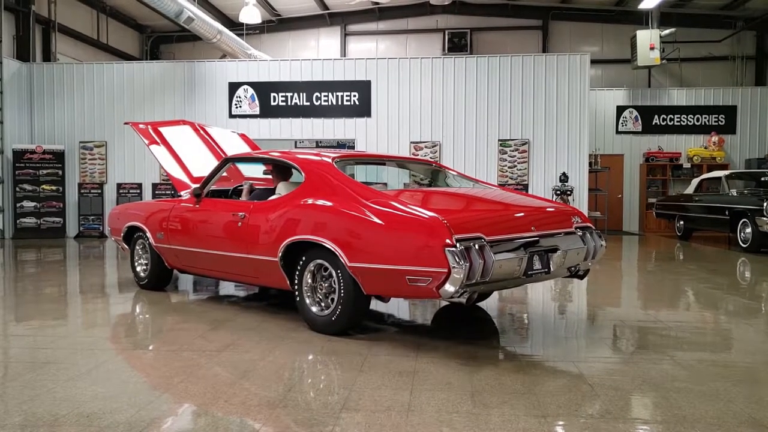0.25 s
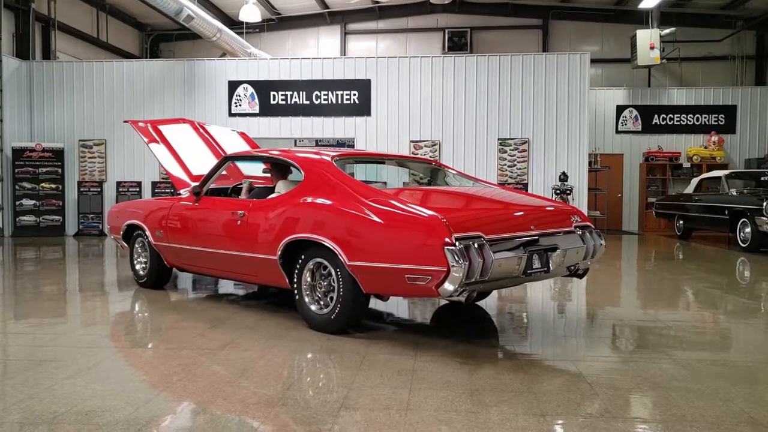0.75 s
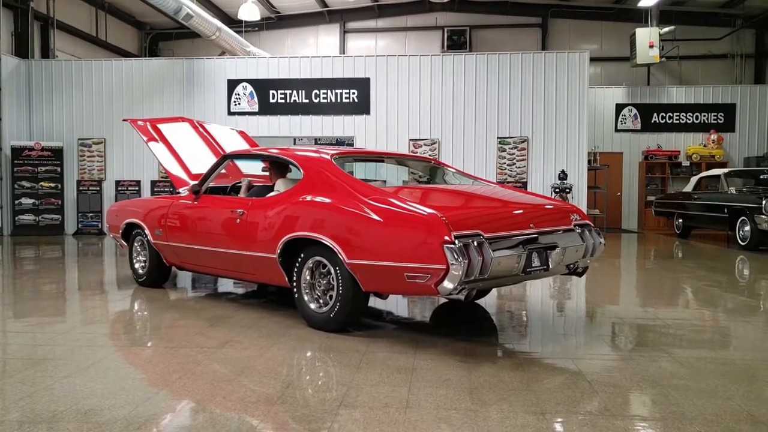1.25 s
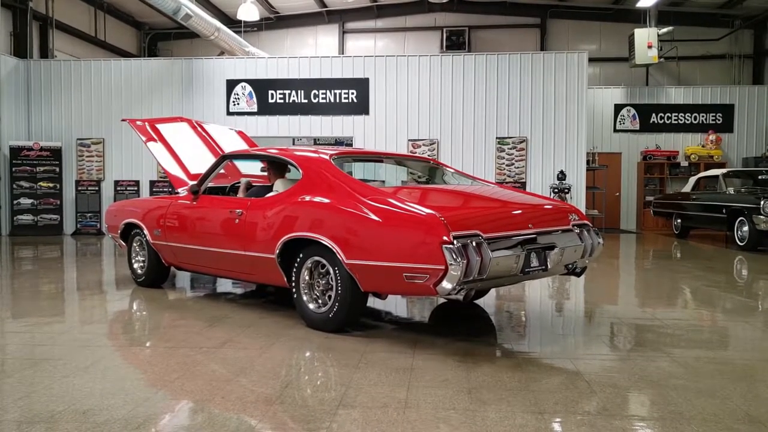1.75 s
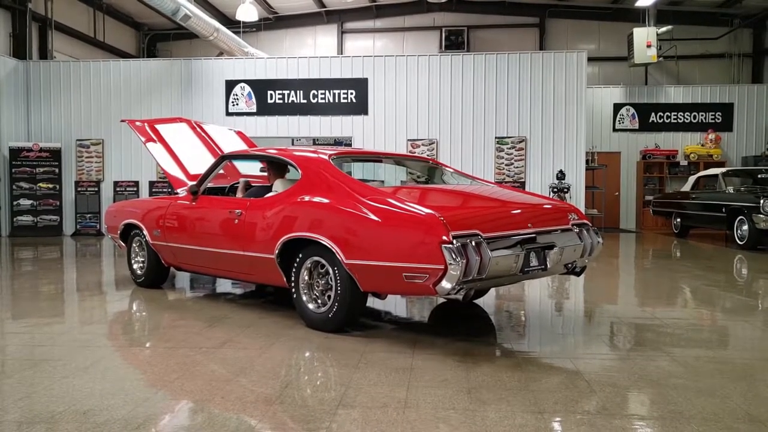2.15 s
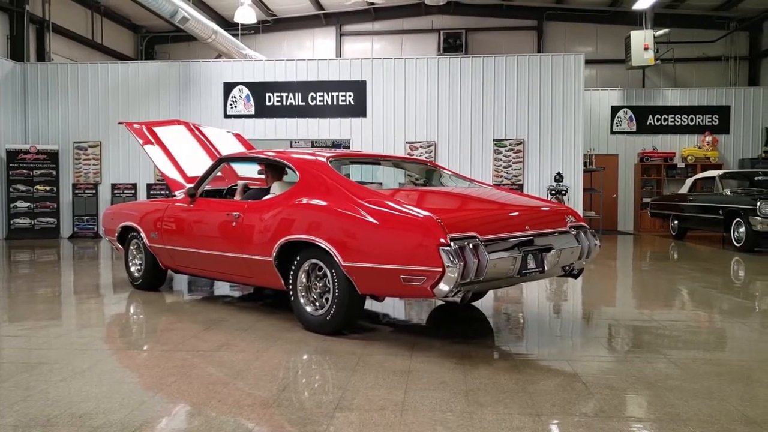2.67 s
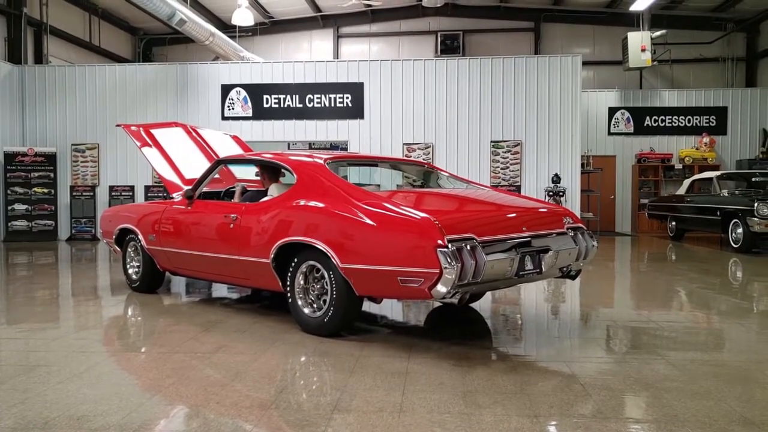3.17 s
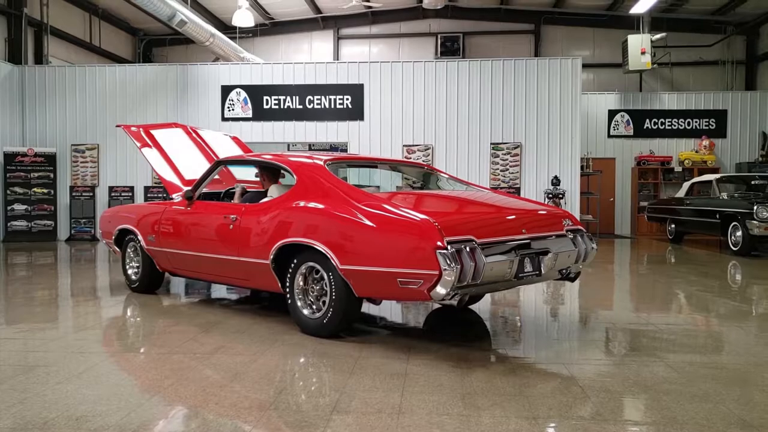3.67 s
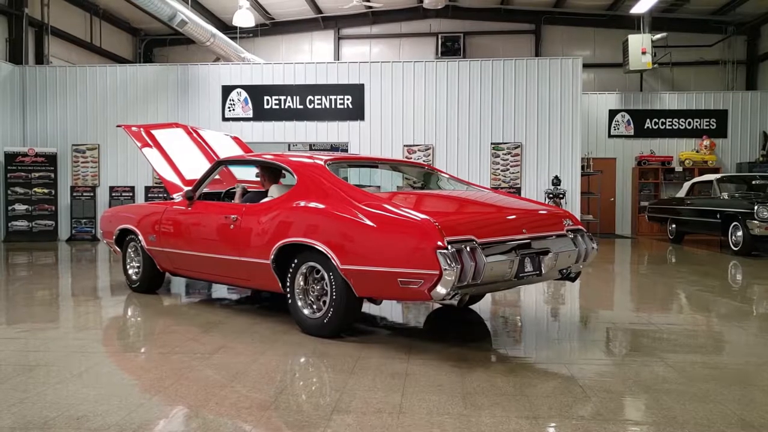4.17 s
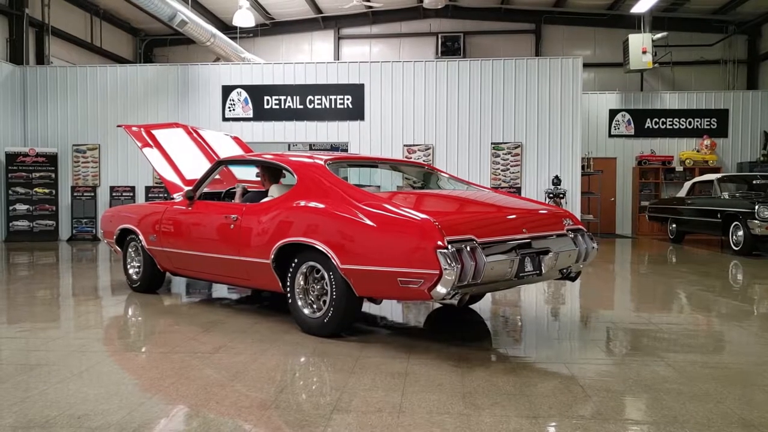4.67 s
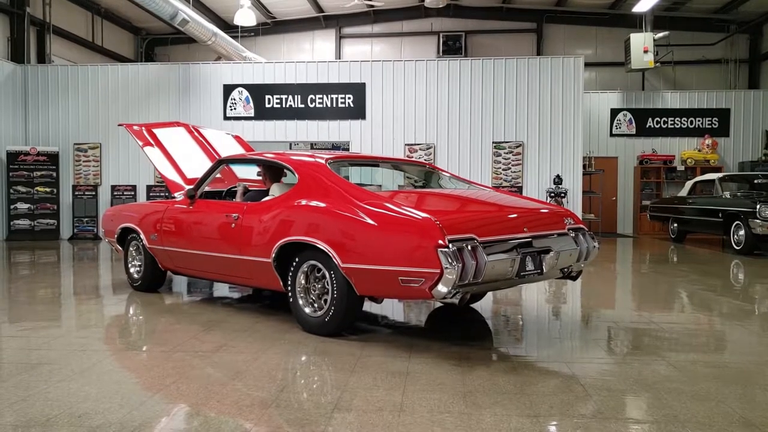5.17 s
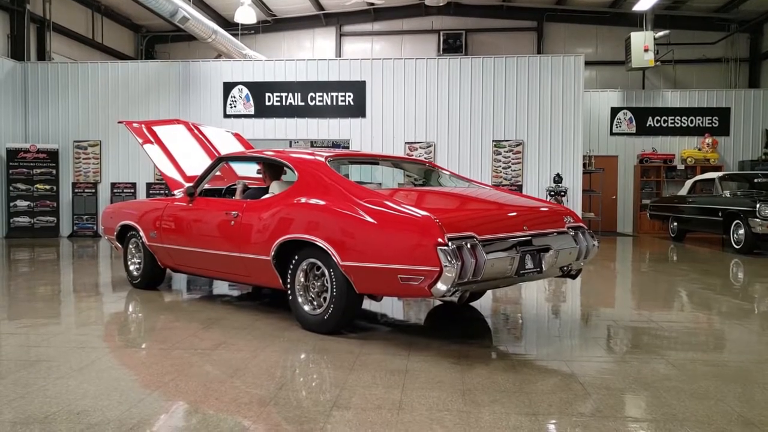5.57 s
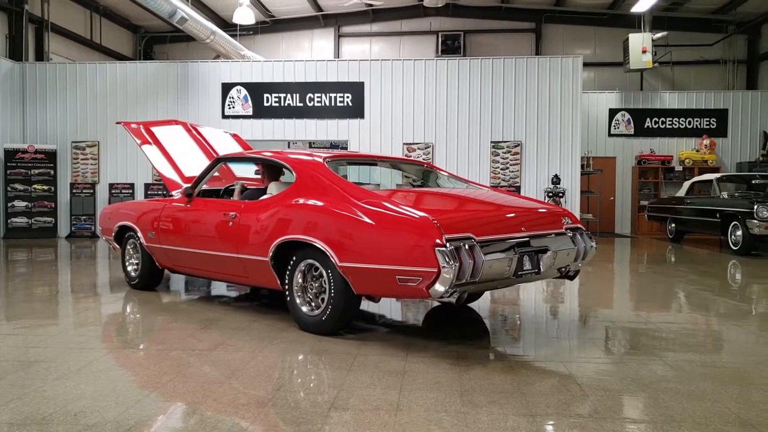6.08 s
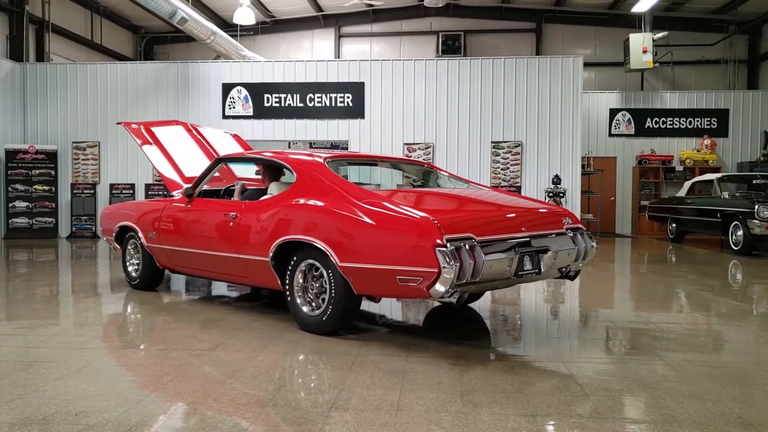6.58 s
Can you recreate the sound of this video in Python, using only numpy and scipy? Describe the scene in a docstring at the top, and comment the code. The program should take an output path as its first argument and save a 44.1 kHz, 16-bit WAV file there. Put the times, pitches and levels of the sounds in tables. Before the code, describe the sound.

A big V8 car engine idles in a large showroom hall, heard from behind the car and slightly to the left. The exhaust has a deep, pulsing rumble, with a faint fan hum, light valve clatter and a soft rush of air above it. At about 1 second the throttle is stabbed once: the intake gulps and hisses briefly, a few metallic knocks sound, and the engine climbs to a loud, ragged roar that peaks around 1.6 seconds and echoes in the hall. The overall level ducks a little under the roar. The pitch then falls, booming on the way down, and is back at idle by about 3.5 seconds. The level gradually recovers, and the engine keeps throbbing steadily, with scattered light metallic ticks, until the end at nearly 7 seconds.

```python
"""A showroom hall, behind a big idling V8. One stab of the throttle makes it roar and ducks the
recorder's gain; the engine sinks back and settles while the gain recovers. The tailpipes boom on
the engine's orders and puff at every firing, and ragged burns bark through the mufflers off idle.
The fan hums, the valve gear clatters over rushing air, and ticks and knocks ring the manifold and
the block. The carburettor gulps and hisses while the throttle is open."""
import sys
import numpy as np
from scipy import signal
from scipy.fft import rfft, irfft, next_fast_len
from scipy.io import wavfile
from scipy.ndimage import uniform_filter1d, minimum_filter1d

SR = 44100
rng = np.random.default_rng(int(sys.argv[2]) if len(sys.argv) > 2 else 0)


def unload_audio(sound):
    """Save the sound as a 16-bit wav file, at the path given as the first command line argument."""
    columns = np.transpose(np.atleast_2d(sound))
    # keep every value between -1 and 1, then stretch to whole-number steps
    steps = np.round(np.clip(columns, -1, 1) * 32767)
    wavfile.write(sys.argv[1], SR, steps.astype(np.int16))


N = 301203

# response of pipes and mufflers: (frequency [Hz], gain [dB])
PIPE_RESPONSE = [(22, -36), (40, 3), (55, -6), (66, 12), (90, 5.5), (108, -16), (135, -0.5), (148, -6),
                 (156, 3), (163, -5.5), (190, -13), (232, -6.5), (255, -11.5), (280, -16.5), (312, -11),
                 (420, -22.5), (800, -54)]
# gas puffs at the tailpipes: (frequency [Hz], level [dB])
PUFF_SPECTRUM = [(120, -23), (300, 3), (400, -1), (480, -5.5), (545, 4.5), (620, 1.5), (700, 0), (800, -4),
                 (1000, -12), (1300, -13.5), (2200, -19.5), (5000, -71)]

IDLE_HZ = 67.3   # firings per second; eight firings make one engine cycle
OPEN_S, OPENING_S, CLOSE_S, CLOSING_S = 1.03, 0.21, 1.385, 0.13   # the throttle stab
PUFF_LAW = dict(idle_db=-34, doubling_db=9.86, load_db=0.14)
CLATTER_LAW = dict(idle_db=-37.5, doubling_db=8.8, load_db=3.1)


def from_db(db):
    """Decibels to gain."""
    return 10 ** (np.asarray(db) / 20)


def rms_one(x):
    """Scale to unit power."""
    return x / np.sqrt(np.mean(x ** 2) + 1e-20)


def at_hz(points, hz):
    """Read a spectrum on a log-frequency axis."""
    f, value = np.transpose(points)
    return np.interp(np.log(np.maximum(hz, 1)), np.log(f), value)


def shaped(x, gain_at):
    """Filter with a gain given as a function of frequency."""
    size = next_fast_len(N + SR // 2)
    return irfft(rfft(x, size) * gain_at(np.arange(size // 2 + 1) * SR / size), size)[..., :N]


def coloured(x, spectrum):
    """EQ x with a spectrum, rolling off below its first point."""
    return shaped(x, lambda hz: from_db(at_hz(spectrum, hz)) * np.minimum(hz / spectrum[0][0], 1) ** 2)


def drift(hz):
    """Slow random wander of unit spread."""
    step = 40   # samples per control point
    r = np.exp(-2 * np.pi * hz * step / SR)
    slow = signal.lfilter([1], [1, -2 * r, r * r], rng.standard_normal(N // step + 2002))[2000:]
    return np.interp(np.arange(N) / step, np.arange(len(slow)), rms_one(slow))


def evened(x):
    """Hold the level steady over about one engine cycle, leaving the throb inside it."""
    power = np.mean(np.atleast_2d(x) ** 2, axis=0)
    power = uniform_filter1d(uniform_filter1d(power, size=5300), size=2600)
    return x / np.sqrt(np.maximum(power, 1e-12))


def spread(mid, side):
    """The hall makes the two ears less alike towards the treble."""
    # likeness of the two ears: (frequency [Hz], correlation)
    ear_likeness = [(60, .995), (125, .975), (250, .91), (500, .58), (1000, .25), (2000, .2), (4000, -.03),
                    (15000, -.03)]

    def width(hz):
        likeness = at_hz(ear_likeness, hz)
        return np.sqrt((1 - likeness) / (1 + likeness))
    return mid + shaped(side, width) * [[1], [-1]]


def hall(x, wet_db, t60_s=0.99):
    """Mid and side: direct sound plus a diffuse tail, and a second tail for width."""
    t = np.arange(int(t60_s * SR)) / SR
    tails = rng.standard_normal((2, len(t))) * from_db(-60 * t / t60_s) * (t > .004)
    tails /= np.sqrt(np.sum(tails ** 2, axis=1, keepdims=True))
    mid, side = signal.fftconvolve(x[None], tails, axes=1)[:, :N] * from_db(wet_db)
    return x + mid, side


def gated_noise(gate, spectrum):
    """Stereo turbulence that swells with the gate; its mid signal has unit power."""
    mid, side = coloured(rng.standard_normal((2, N)) * gate, spectrum)
    return spread(rms_one(mid), rms_one(side))


def firing_gate(firings, decay, scatter_db, floor):
    """A burst per firing (decay in firings); cylinders differ in strength and no two burns are alike."""
    cylinder_db = np.array([-4.0, -5.0, -11.5, -6.5, -8.5, -8.0, -8.5, -15.0])
    index = firings.astype(int)
    strength = from_db(cylinder_db[index % 8] + scatter_db * rng.standard_normal(N // 100)[index])
    return floor + strength * np.exp(-(firings % 1) / decay)


def near(hz, centre_hz, width):
    """1 on a resonance, 0 far from it; width is a share of its pitch."""
    return np.exp(-(np.log(hz / centre_hz) / width) ** 2)


def throttle(lag_s=0):
    """The pedal goes down, stays a moment and is let go: 0 shut, 1 open."""
    t = np.arange(N) / SR - lag_s
    return np.clip((t - OPEN_S) / OPENING_S, 0, 1) * np.clip(1 - (t - CLOSE_S) / CLOSING_S, 0, 1)


def loudness_db(rate, idle_db, doubling_db, load_db):
    """A part grows louder with each doubling of engine speed and with an open throttle."""
    return idle_db + doubling_db * np.log2(rate / IDLE_HZ) + load_db * throttle()


def pipe_db(rate, idle_db, off_idle_db, flow_db, resonant_db):
    """A level that shifts off idle, with gas flow, and as both banks or one hit the pipe resonance."""
    boom_hz, width = 80.2, 0.057
    off_idle = 1 - np.exp(-np.maximum(rate / IDLE_HZ - 1, 0) / 0.14)   # 14% faster breaks the even beat
    flow = throttle(lag_s=0.054) * rate / IDLE_HZ   # the gas reaches the tailpipes after the pedal
    resonant = near(rate, boom_hz, width) + near(rate / 2, boom_hz, width)
    return idle_db + off_idle_db * off_idle + flow_db * flow + resonant_db * resonant


def pipe_tones(firings, rate, waver=.09):
    """The engine's orders sweep through the pipe resonances, each wavering a little."""
    # uneven firing of the two banks: (order [multiple of the cycle rate], level [dB])
    engine_orders = [(4, -8.5), (5, -14), (6, -16), (8, 1), (9, -14), (10, -2), (11, 6), (12, -1),
                     (13, -25), (15, -7.5), (16, -18), (19, -4.5), (24, -13), (27, -3.5), (28, -14),
                     (29, -7.5), (33, -32), (36, -3.5), (38, -16.5)]
    out = 0
    for order, level_db in engine_orders:
        ratio = order / 8
        # reflections delay the higher orders unevenly
        angle = 2 * np.pi * ratio * firings + ratio * rng.standard_normal()
        wobble = drift(5) * np.cos(angle) + drift(5) * np.sin(angle)
        tone = np.cos(angle) + waver * np.sqrt(ratio) * wobble
        out = out + from_db(level_db + at_hz(PIPE_RESPONSE, ratio * rate)) * tone
    return evened(out)


def exhaust(firings, rate):
    """Clean orders over burble and gas puffs; a ragged roar takes over through the rev and run-down."""
    def low_band(hz):
        return 1 / (1 + (hz / 112) ** 12)   # crossover between boom and growl
    tones = pipe_tones(firings, rate)
    burble = gated_noise(firing_gate(firings, decay=0.56, scatter_db=1, floor=0.045), PIPE_RESPONSE)
    roar_db = pipe_db(rate, idle_db=-33, off_idle_db=37.5, flow_db=-0.5, resonant_db=-6.5)
    roar = from_db(roar_db) * ragged_roar(firings)
    boom = shaped(tones + from_db(-20) * burble + from_db(-1) * roar, low_band)
    boom_db = pipe_db(rate, idle_db=-18.5, off_idle_db=-5, flow_db=4, resonant_db=10)
    growl = shaped(tones + from_db(-14) * burble + from_db(5) * roar, lambda hz: 1 - low_band(hz))
    # when the idle sags, the 19th order meets a narrow resonance
    drone_db = 4 * near(rate * 19 / 8, centre_hz=154.55, width=0.015)
    growl_db = loudness_db(rate, idle_db=-25, doubling_db=10, load_db=2.4) + drone_db
    puffs = gated_noise(firing_gate(firings, decay=0.37, scatter_db=-6, floor=1), PUFF_SPECTRUM)
    puffs *= from_db(loudness_db(rate, **PUFF_LAW))
    return from_db(boom_db) * evened(boom) + from_db(growl_db) * evened(growl) + puffs


def pipe_rasp(firings, rate):
    """The steep front of every exhaust pulse rings the tailpipes and the hall."""
    fronts = np.diff(np.floor(firings), prepend=0)
    fronts *= firing_gate(firings, decay=.5, scatter_db=5, floor=0)
    rasp = spread(*hall(coloured(fronts, PUFF_SPECTRUM), wet_db=12.5))
    return from_db(loudness_db(rate, **PUFF_LAW) - 3) * evened(rasp)


def fan(firings, blade_ratio=1.818):
    """A hum from the belt drive, likely the fan's blades, a little under twice the firing rate."""
    level = from_db(-32.5 + drift(7.4))
    return level * np.sqrt(2) * np.sin(2 * np.pi * blade_ratio * firings + .5 * drift(1.9))


def engine_bay(firings, rate):
    """Valve gear clatters in step with the firings over a smooth rush of air."""
    # valve gear, belts and block: (frequency [Hz], level [dB])
    clatter_spectrum = [(700, -34), (1150, 2), (1400, -2), (1700, 2), (2100, 2.5), (2700, -2), (3300, -3.5),
                        (4500, -4.5), (5100, -12), (7400, -18.5), (9000, -47)]
    # air through fan and carburettor: (frequency [Hz], level [dB])
    rush_spectrum = [(1500, -6), (4000, 0), (5800, 2), (7600, 1.5), (8400, -7), (9700, -6), (10800, -3.5),
                     (13000, -4), (15800, -6.5)]
    clatter = gated_noise(firing_gate(firings, decay=1, scatter_db=4.5, floor=1), clatter_spectrum)
    rush = gated_noise(firing_gate(firings, decay=0.42, scatter_db=9, floor=6.4), rush_spectrum)
    rush_db = loudness_db(rate, idle_db=-41.5, doubling_db=9.9, load_db=5)
    return from_db(loudness_db(rate, **CLATTER_LAW)) * clatter + from_db(rush_db) * rush


def struck_metal(hits, modes, rattle):
    """Each hit rings every mode with its own strength and rebounds once; rattle adds faint taps."""
    hit_s, hit_db = np.transpose(hits)
    scatter_db = 1.5 * rng.standard_normal((len(hit_s), len(modes)))
    rebound_s = hit_s + rng.uniform(.003, .009, len(hit_s))
    swell = np.exp(-1 / (.0012 * SR))   # the ring takes about a millisecond to spread over the casting
    bandpass = np.array([1, 0, -1]) * (1 - swell ** 2) / 2
    out = 0
    for k, (hz, t60, level_db) in enumerate(modes):
        blows = rattle * rng.standard_normal(N)
        blows[(hit_s * SR).astype(int)] = from_db(hit_db + scatter_db[:, k])
        blows[(rebound_s * SR).astype(int)] = -.5 * from_db(hit_db - scatter_db[:, k])
        r, w = from_db(-60 / (t60 * SR)), 2 * np.pi * hz / SR
        ping = signal.lfilter([0, np.sin(w)], [1, -2 * r * np.cos(w), r * r], blows + 1e-18)
        ping = signal.lfilter(bandpass, [1, -2 * swell * np.cos(w), swell ** 2], ping)
        out = out + (-1) ** k * from_db(level_db) * ping
    return out


def ticks_and_knocks(firings, rate):
    """Ticks ping the manifold; knocks and a tap per firing ring the block too. All echo in the hall."""
    # single ticks, loud and light, on top of the faint one per cycle: (time [s], level [dB])
    single_ticks = [(0.132, -35), (0.2516, -30), (1.0939, -30), (3.695, -35), (3.93, -33), (4.0513, -30),
                    (4.2867, -34), (4.7622, -34), (5.003, -33.5), (5.1223, -37), (5.365, -33), (5.6064, -31),
                    (5.7229, -34), (6.4388, -33), (6.5577, -32)]
    # under load one cylinder knocks every cycle: (time [s], block level [dB], manifold level [dB])
    load_knocks = [(1.1344, -31, -29), (1.2281, -28, -17.5), (1.3094, -10, -23), (1.3778, -9, -21),
                   (1.4341, -20, -23)]
    # ring of the manifold: (frequency [Hz], t60 [s], level [dB])
    manifold_modes = [(1650, .02, -8), (2060, .02, -8), (3080, .018, -6), (3240, .026, -2),
                      (3490, .024, -2.5), (3720, .016, -7), (4500, .014, -9)]
    # ring of the block: (frequency [Hz], t60 [s], level [dB])
    block_modes = [(1450, .025, -6), (1720, .022, -7), (1930, .028, -2), (2130, .028, -1), (3400, .015, -9)]
    force = from_db(loudness_db(rate, **CLATTER_LAW))
    taps = force * from_db(2.5 * throttle()) * np.diff(np.floor(firings), prepend=0)   # harder under load
    valve = force * np.diff(np.floor((firings - .65) / 8), prepend=-1)   # one faint tick per cycle
    # the dB offsets set how well each blow reaches the modes
    pings = [(s, db + 4.5) for s, db in single_ticks] + [(s, db + 4) for s, _, db in load_knocks]
    knocks = [(s, db - 2.5) for s, db, _ in load_knocks]
    manifold = struck_metal(pings, manifold_modes, rattle=from_db(-11) * taps + from_db(-4) * valve)
    block = struck_metal(knocks, block_modes, rattle=from_db(-5.5) * taps)
    return spread(*hall(manifold + block, wet_db=-6))


def ragged_roar(firings):
    """Very uneven pulses bark through the mufflers and the hall, with turbulence behind each."""
    # ragged burns through the mufflers: (frequency [Hz], level [dB])
    roar_spectrum = [(45, -11), (62, 6), (86, -2), (112, 6.5), (165, 6), (195, 2), (240, 3), (285, -3),
                     (322, 1.5), (365, -12.5), (420, -6), (520, -10), (750, -13), (1150, -16),
                     (1500, -18.5), (2500, -36.5), (8000, -60)]
    pulses = firing_gate(firings, decay=.08, scatter_db=5.5, floor=0)
    pulses -= uniform_filter1d(pulses, size=900)   # take out the steady flow
    bark = spread(*hall(coloured(pulses, roar_spectrum), wet_db=2))
    turbulence = gated_noise(firing_gate(firings, decay=0.33, scatter_db=4, floor=1), roar_spectrum)
    return .55 * evened(bark) + .83 * turbulence


def intake(gulp_after_s=0.107, gulp_width_s=0.022):
    """The carburettor gulps as the throttle cracks open and hisses until it shuts."""
    # air sucked past the throttle: (frequency [Hz], level [dB])
    hiss_spectrum = [(1000, -8), (1400, -8), (3000, 10), (8500, -4.5), (11000, -1), (15800, -2)]
    gulp = np.exp(-((np.arange(N) / SR - OPEN_S - gulp_after_s) / gulp_width_s) ** 2)
    flow = from_db(-33.5) * gulp + from_db(-32.5) * throttle() ** 4
    return flow * gated_noise(from_db(drift(30)), hiss_spectrum)


def gain_control(x, limit_db=-11.5, duck_s=0.16, hold_s=1.88, recover_db_per_s=4.5):
    """Sound above the limit turns the gain down; it is held there, then creeps back."""
    power = uniform_filter1d(np.mean(x ** 2, axis=0), size=4400)
    over_db = np.maximum(10 * np.log10(np.maximum(power, 1e-12)) - limit_db, 0)
    hold = int(hold_s * SR)
    held_db = -minimum_filter1d(-over_db, hold, origin=(hold - 1) // 2, mode="nearest")
    creep_db = recover_db_per_s * np.arange(N) / SR
    cut_db = np.maximum.accumulate(held_db + creep_db) - creep_db
    lag = np.exp(-1 / (duck_s * SR))
    return x * from_db(-signal.lfilter([1 - lag], [1, -lag], cut_db))


def scene():
    """The engine follows the crankshaft and the pedal; the car stands a little to the left."""
    # idle, rev and run-down: (time [s], firing rate [Hz])
    engine_speed = [(0.0, 65.01), (1.03, 67.18), (1.19, 80.48), (1.33, 111.03), (1.46, 160.24),
                    (1.57, 173.42), (1.8, 155.43), (2.18, 104.9), (2.45, 88.41), (3.03, 73.58),
                    (3.7, 67.48), (4.75, 67.33), (5.2, 65.74), (5.8, 67.66), (6.83, 66.28)]
    # stereo balance: (frequency [Hz], left minus right [dB])
    left_lean = [(60, 3.5), (150, 3.3), (380, 2), (950, 2.6), (2380, 0.99), (5980, 4.9), (15000, 6.4)]
    rate = np.interp(np.arange(N) / SR, *np.transpose(engine_speed))
    firings = np.cumsum(rate) / SR
    tailpipes = exhaust(firings, rate) + pipe_rasp(firings, rate)
    engine = fan(firings) + engine_bay(firings, rate) + intake() + ticks_and_knocks(firings, rate)
    return shaped(tailpipes + engine, lambda hz: from_db(at_hz(left_lean, hz) * [[.5], [-.5]]))


def record(dry):
    """The microphone sheds the deepest bass, the roar ducks the gain, peaks clip and the top is cut."""
    rumble_cut = signal.butter(2, 28, "high", fs=SR, output="sos")
    ducked = gain_control(signal.sosfilt(rumble_cut, dry))
    cutoff_hz = 15950
    return shaped(np.clip(ducked, -1, 1), lambda hz: 1 / np.sqrt(1 + (hz / cutoff_hz) ** 400))


dry = scene()
out = record(dry)
unload_audio(out)
```